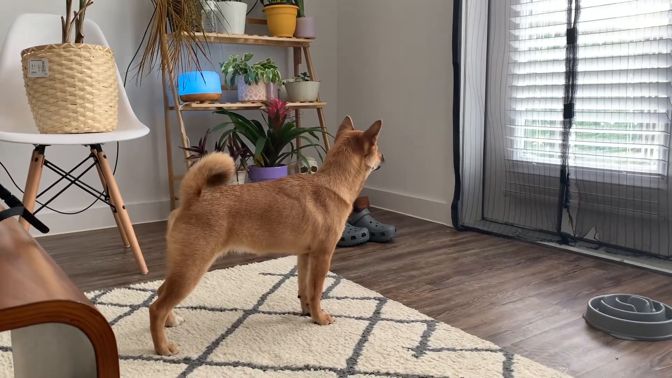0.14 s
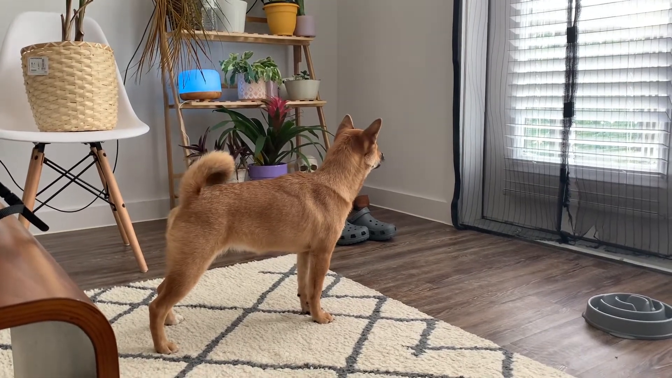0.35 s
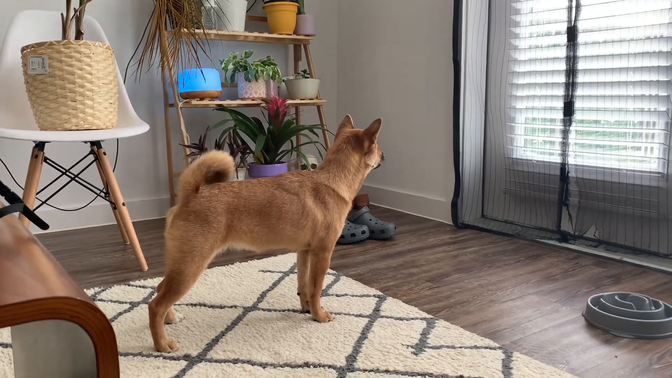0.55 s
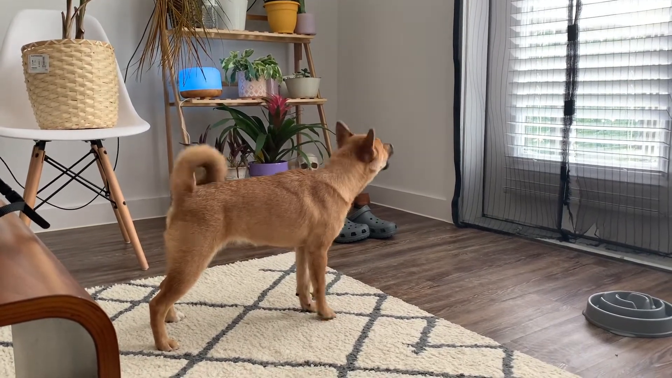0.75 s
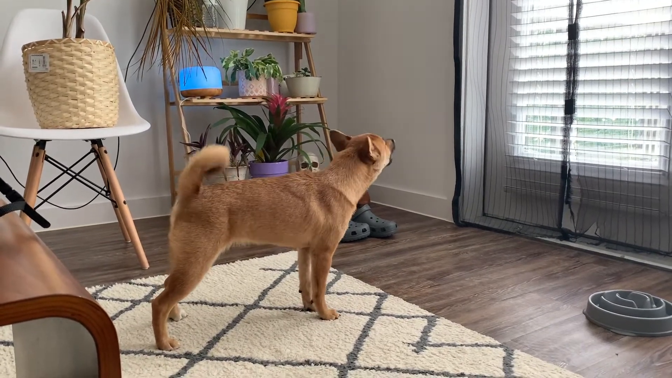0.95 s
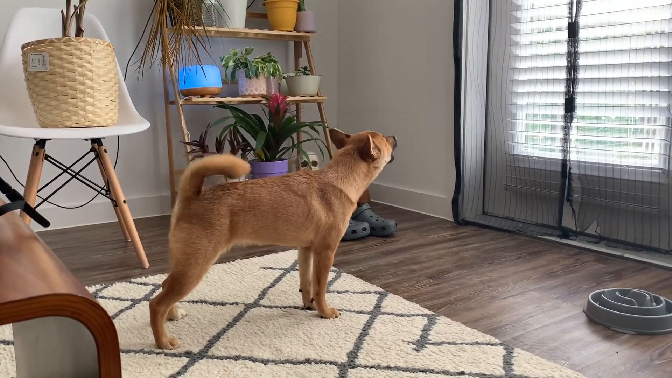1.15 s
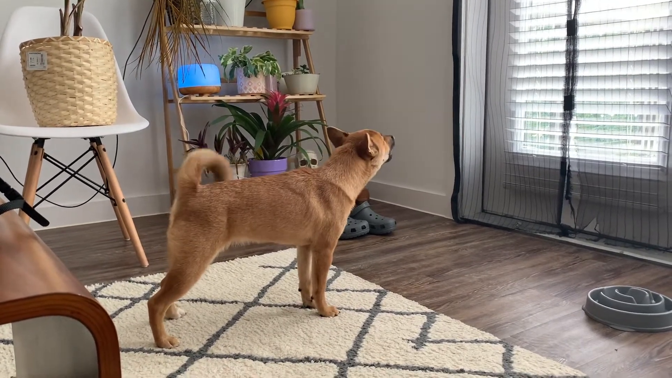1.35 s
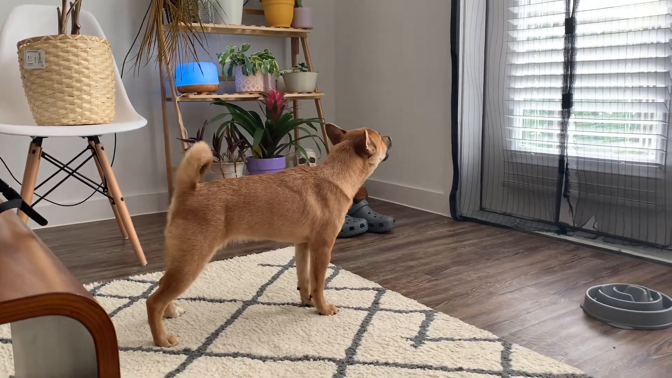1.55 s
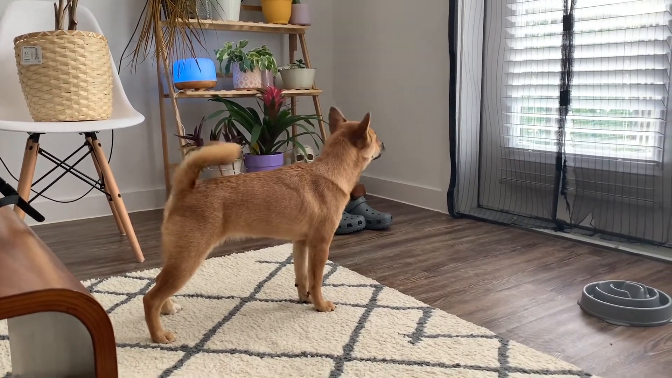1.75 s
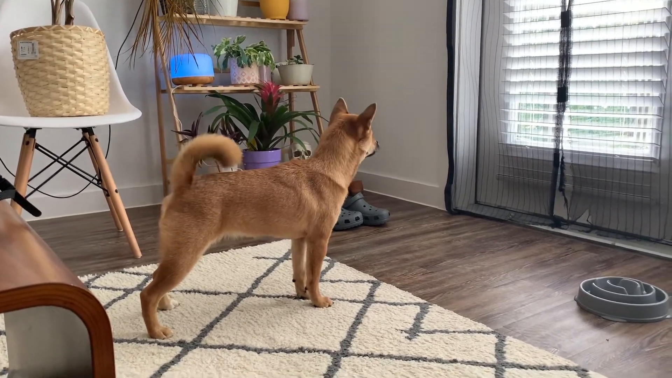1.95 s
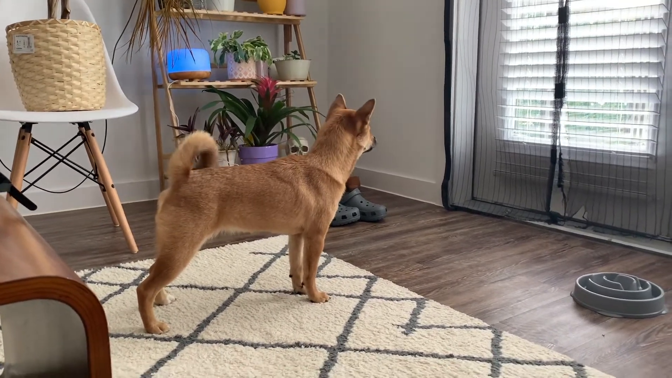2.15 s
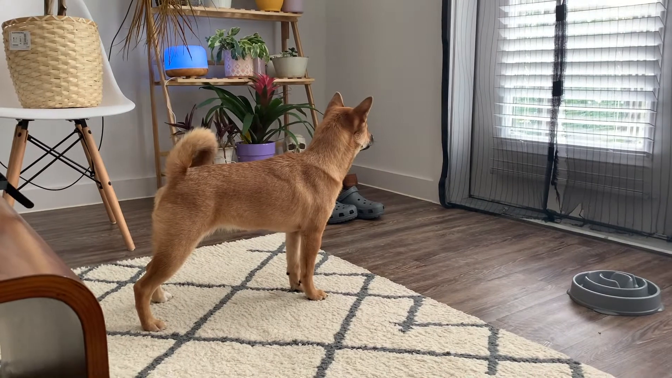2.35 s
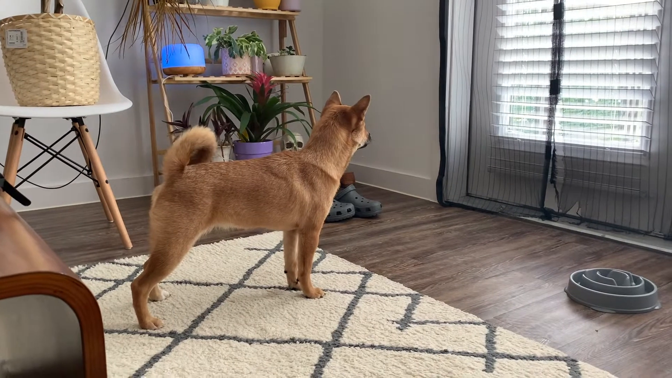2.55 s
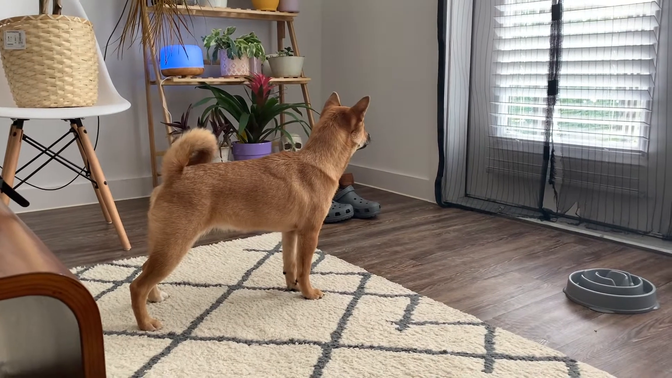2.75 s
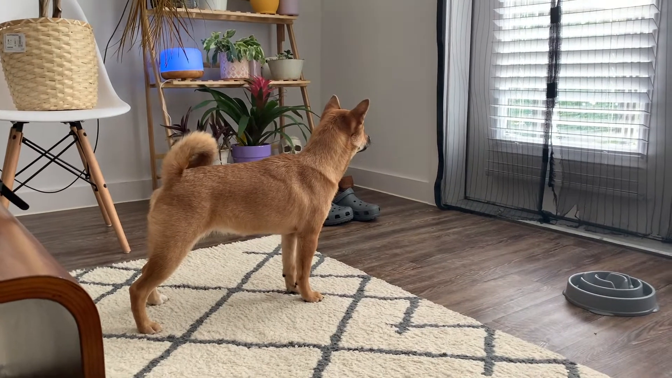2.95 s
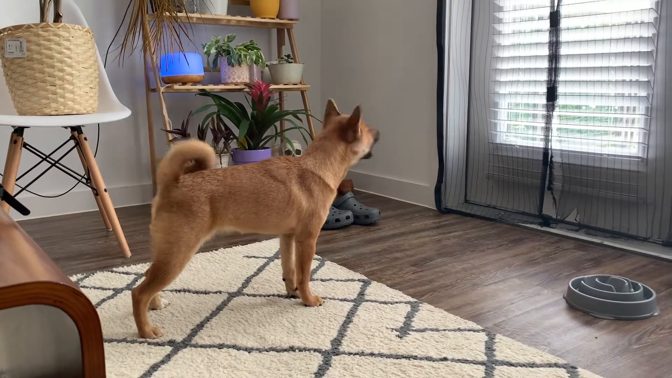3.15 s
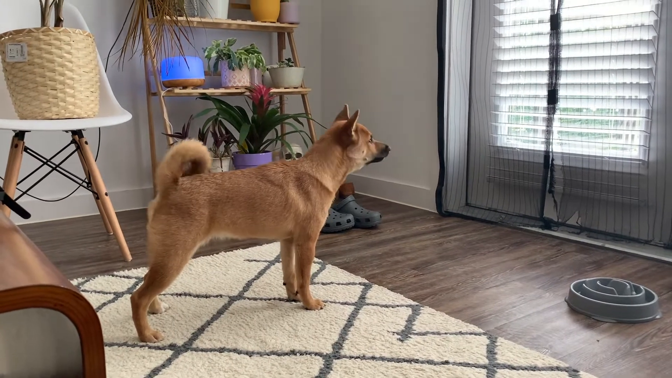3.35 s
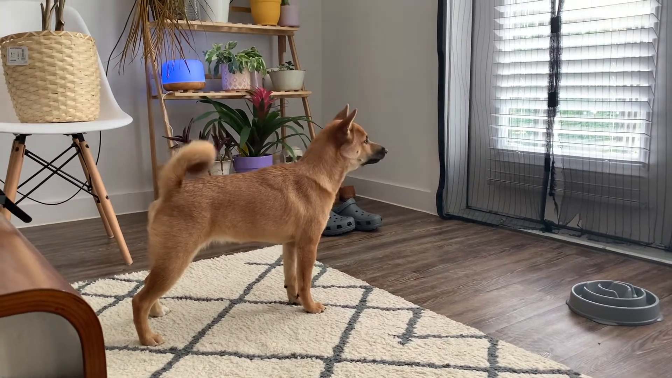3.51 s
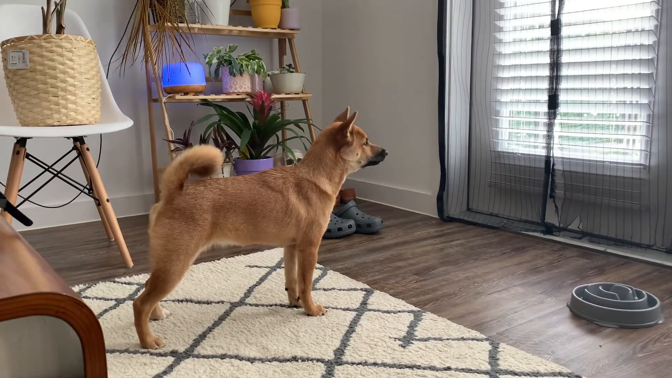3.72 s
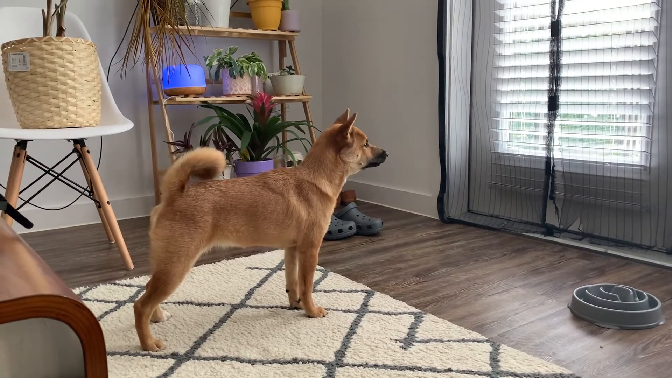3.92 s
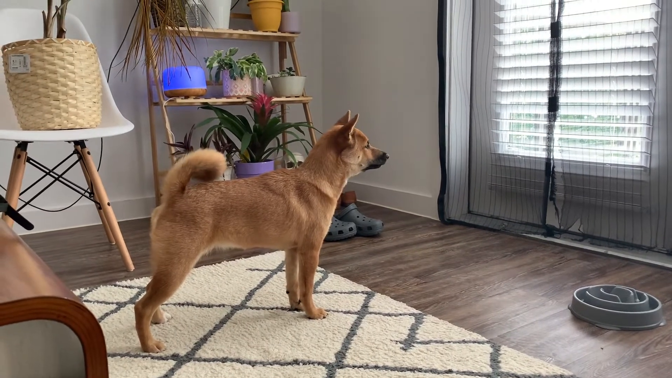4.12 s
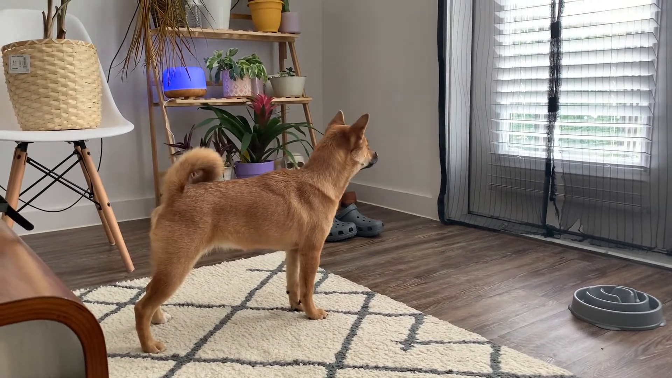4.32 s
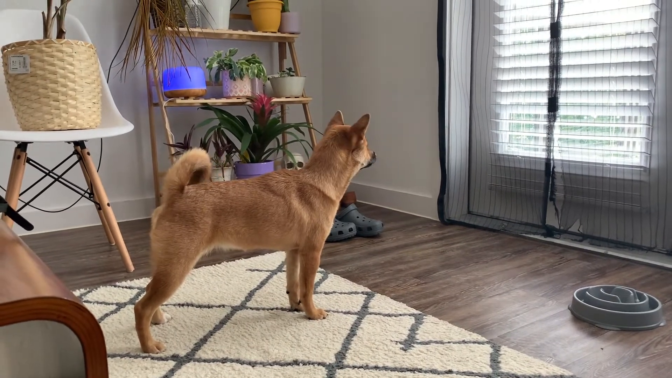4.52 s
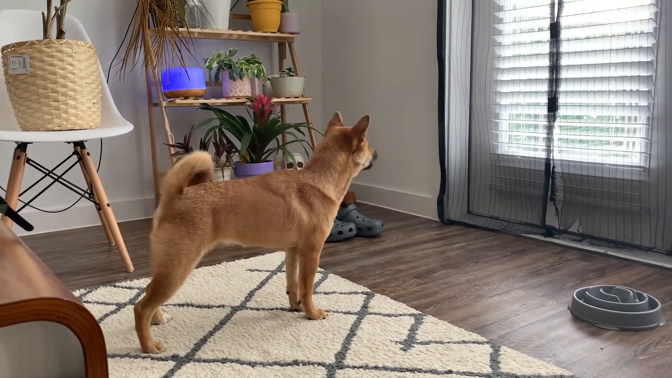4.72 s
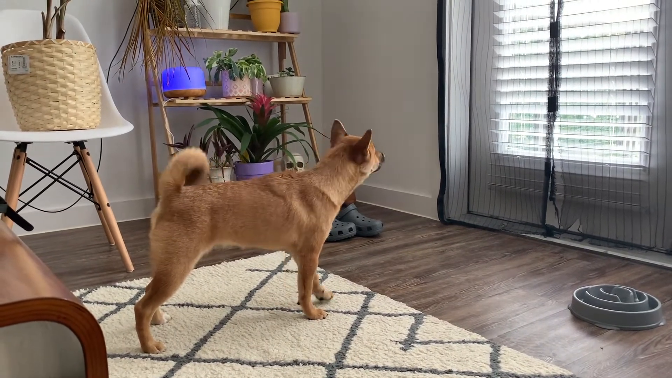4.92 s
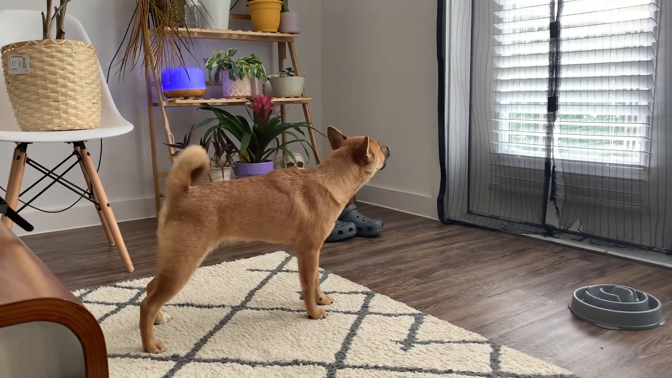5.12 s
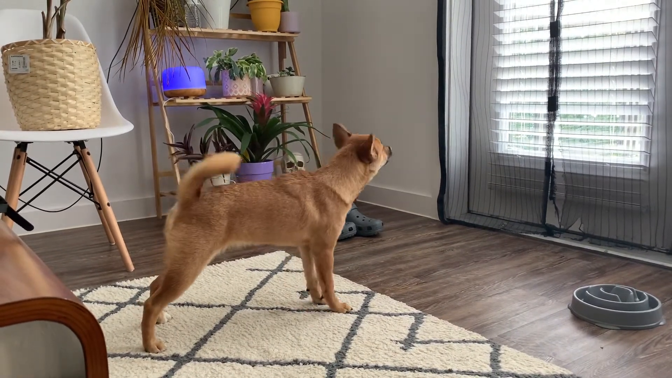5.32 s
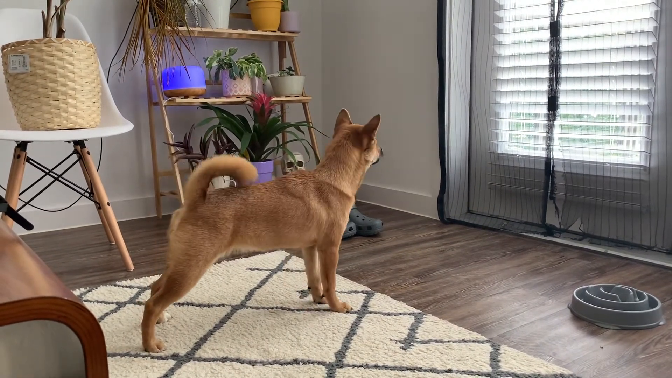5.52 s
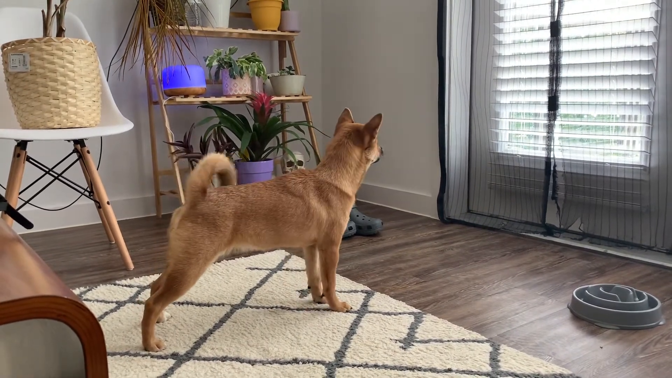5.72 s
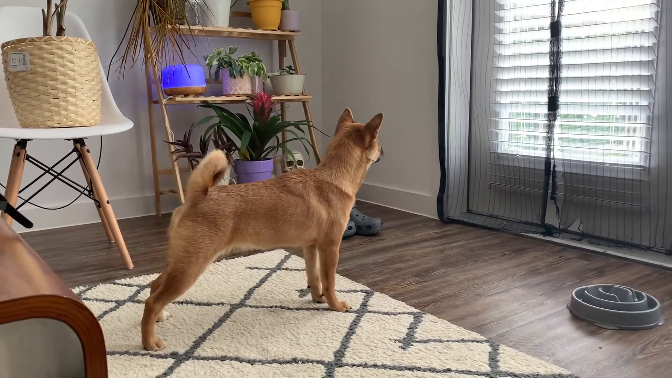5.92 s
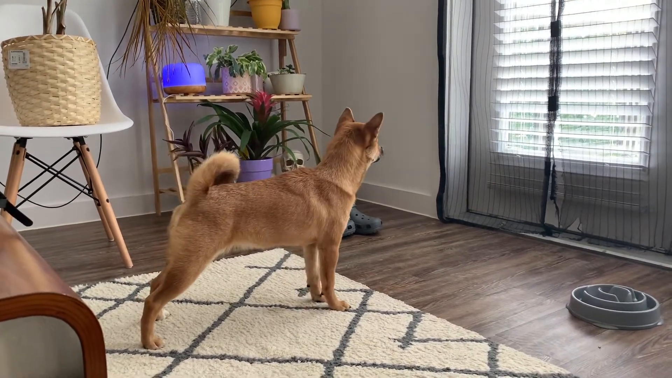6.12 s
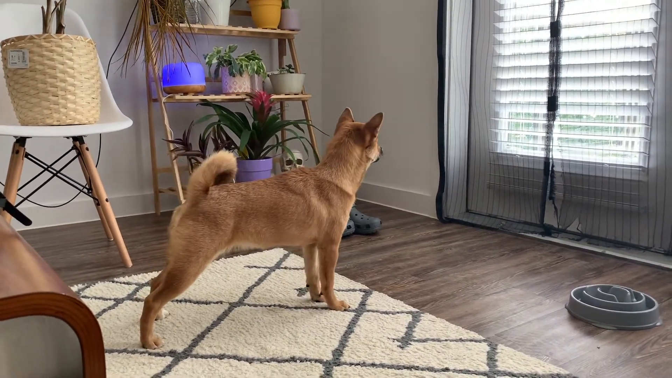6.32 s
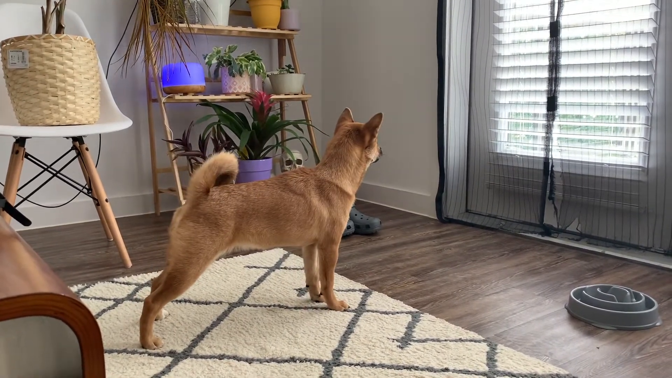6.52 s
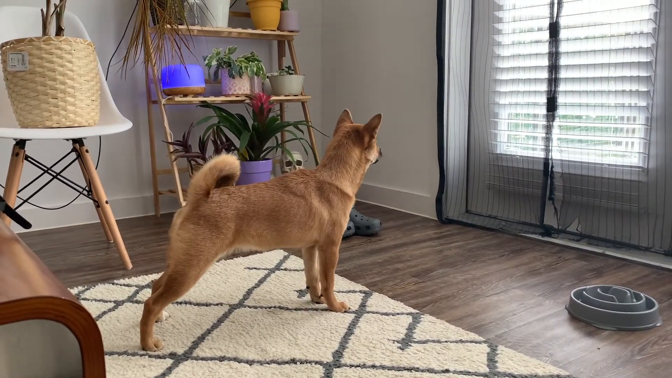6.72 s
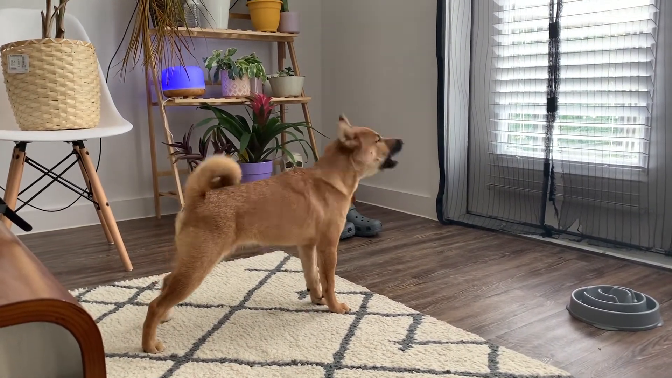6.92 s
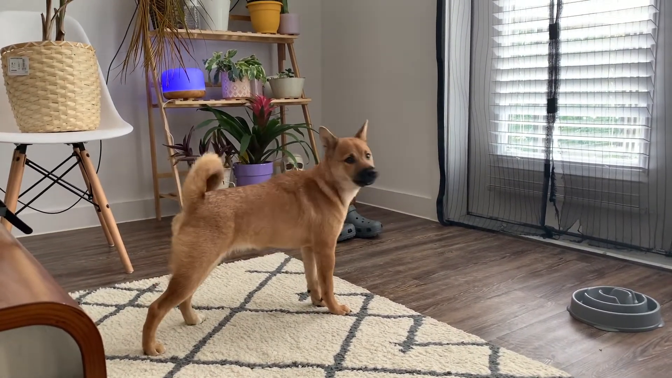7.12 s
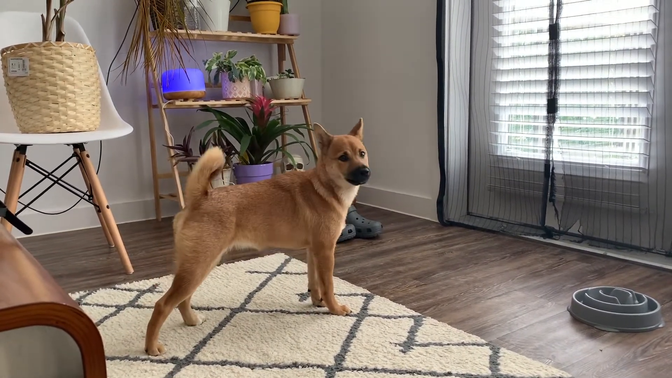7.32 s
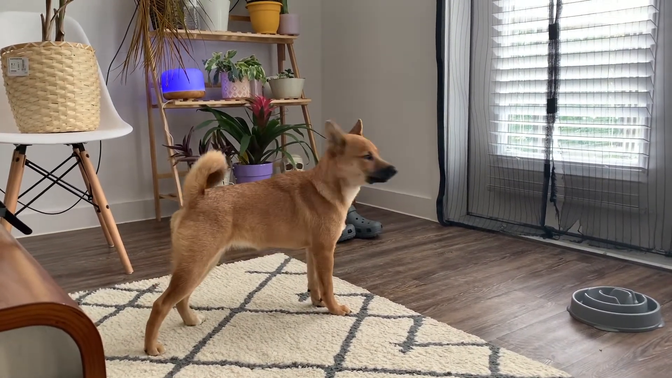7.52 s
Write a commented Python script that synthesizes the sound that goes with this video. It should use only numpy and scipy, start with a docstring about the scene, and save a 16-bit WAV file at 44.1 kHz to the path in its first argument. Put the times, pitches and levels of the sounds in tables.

```python
"""A young dog barks four times in a bright living room with a wooden floor, a few steps from a hand-held camera.
The first bark runs on into a long falling howl, the third into a rough 'woo-woo'; a soft whine follows the last.
Each call is made of vocal fold pulses and rasping air, shaped by the moving throat and the chest.
The room rings for about half a second, over handling rumble and a quiet ventilation hush with faint fan tones."""
import sys
import numpy as np
from scipy import signal
from scipy.fft import rfft, irfft, next_fast_len
from scipy.io import wavfile
from scipy.ndimage import uniform_filter1d, minimum_filter1d, map_coordinates

SR = 44100
rng = np.random.default_rng(int(sys.argv[2]) if len(sys.argv) > 2 else 0)


def transcribe(signal):
    """Save signal, clipped to [-1, 1], as a 16-bit WAV file at the path in sys.argv[1]."""
    frames = np.atleast_2d(signal).T
    limited = np.clip(frames, -1, 1)
    pcm = np.round(limited * 32767).astype(np.int16)
    wavfile.write(sys.argv[1], SR, pcm)


N = 333396  # length in samples
TOP_HZ = 15750  # upper band limit of the voice and of the camera

# most loud calls grow out of a low murmur and collapse into a short grumble; the two woos join at a high pitch
ONSET_HZ, ONSET_DB, LOUDNESS_CURVE = 206.05, -42.5, 1.36
RELEASE_S, GRUMBLE_S = .014, .105
GRUMBLE_SAG_HZ_PER_S, GRUMBLE_FADE_DB_PER_S = 550, 81
SLACK_ROUGH = 0.26  # roughness of the folds without effort

# Four barks a few steps from the microphone; level_db is the voice before the room:
# start_s, attack_s, hold_s, pitch_hz, level_db, roughness (0-1), mouth_opening (0-1), period_doubling (0-1),
# ring_hz, ring_db, room_db, treble_db
BARK_CALLS = [(0.677, .064, .044, 788.4, -7.5, .72, 0.73, .85, 1034, 7, -7, 0.5),
              (3.117, .068, 0.09, 787.4, -10, .38, 0.86, 0.21, 1279, 5.5, -6, 0),
              (4.713, .068, .088, 785, -11, 0.6, 0.91, 0.2, 1260, 2.5, -3, 0),
              (6.877, .074, .034, 743.3, -10, 0.61, 0.97, 0.44, 970, -1, -6.5, 0.5)]
# during the hold a bark sinks and fades while the jaw shuts
BARK_SAG_HZ_PER_S, BARK_FADE_DB_PER_S, JAW_CLOSE_PER_S = 650, 87.5, 2.6
TREBLE_HZ = 3500  # above this the muzzle beams its sound


def barks():
    """Short rough blasts from an open mouth; the head turns, so each has its own treble and share in the room."""
    out = 0
    for (start, attack, hold, pitch_hz, level_db, rough, mouth, doubling,
         ring_hz, ring_db, room_db, treble_db) in BARK_CALLS:
        def held_voice(s):
            sinking_hz = pitch_hz - BARK_SAG_HZ_PER_S * s
            fading_db = level_db - BARK_FADE_DB_PER_S * s
            return sinking_hz, fading_db, rough, mouth - JAW_CLOSE_PER_S * s, doubling

        voice = call(start, attack, hold, held_voice, ring_hz, ring_db, grumble_db=-43, to_hz=347.7)
        beamed = filtered(voice, lambda hz: amp(treble_db * hz ** 4 / (hz ** 4 + TREBLE_HZ ** 4)))
        out = out + room(beamed, echo_db=room_db)
    return out


# The held note of the howl, before the room: time_s, pitch_hz, level_db
HOWL_NOTE = [(.945, 696.7, -18), (0.998, 723, -15), (1.045, 667.2, -18.5), (1.151, 658.6, -20.5),
             (1.2, 646.3, -22.5), (1.399, 635.9, -22), (1.56, 629.3, -23.5), (1.626, 608.5, -23.5),
             (1.664, 575, -24.5)]
# it swells, turns from hoarse to pure, and cracks at the end
HOWL_ATTACK_S, HOWL_CLEAR_S, HOWL_BREAK_S = .062, 0.042, 0.0052


def howl(rough=.72, pure_rough=0.0027, crack_rough=0.11, doubling=1.0, hoarse_mouth=.22, pure_mouth=0.075):
    """A 'woo' held long: it clears into a pure, falling note and cracks as it gives out."""
    times, pitch_hz, level_db = np.transpose(HOWL_NOTE)
    crest, hold = times[0], times[-1] - times[0]

    def held_voice(s):
        hoarse = np.exp(-(s / HOWL_CLEAR_S) ** 2)
        crack = np.exp((s - hold) / HOWL_BREAK_S)
        hz = np.interp(crest + s, times, pitch_hz)
        db = np.interp(crest + s, times, level_db)
        roughness = pure_rough + rough * hoarse + crack_rough * crack
        return hz, db, roughness, pure_mouth + hoarse_mouth * hoarse, doubling * hoarse

    voice = call(crest - HOWL_ATTACK_S, HOWL_ATTACK_S, hold, held_voice, ring_hz=993, ring_db=9,
                 grumble_db=-36.0, to_hz=234, release_s=.006, slack_rough=0.068)
    return room(voice, echo_db=-4.5)


# Two 'woo' calls after the third bark, before the room:
# start_s, attack_s, hold_s, pitch_hz, level_db, roughness (0-1), mouth_opening (0-1), period_doubling (0-1),
# clearing_s, onset_hz, release_hz
WOO_CALLS = [(4.912, .102, .064, 754.7, -11, 0.46, .5, 1, 0.049, 204.3, 621),
             (5.121, .07, .034, 711, -11, .1, 0.21, 0.8, 0.013, 660, 300.4)]
WOO_SAG_HZ_PER_S = 444


def woos():
    """Calls through rounded lips: each starts hoarse and clears into a tone as the mouth closes."""
    out = 0
    for (start, attack, hold, pitch_hz, level_db, rough, mouth, doubling,
         clear_s, from_hz, to_hz) in WOO_CALLS:
        def held_voice(s):
            hoarse = np.exp(-(s / clear_s) ** 2)
            sinking_hz = pitch_hz - WOO_SAG_HZ_PER_S * s
            return sinking_hz, level_db, rough * hoarse, mouth * hoarse, doubling * hoarse

        out = out + call(start, attack, hold, held_voice, ring_hz=996, ring_db=5.5,
                         grumble_db=-42.5, to_hz=to_hz, from_hz=from_hz)
    return room(out, echo_db=-6.0)


# Soft whines after the last bark; level_db is set before the lips and the room:
# start_s, length_s, pitch_hz, level_db, roughness (0-1), mouth_opening (0-1)
WHINE_CALLS = [(7.422, 0.038, 404.6, -43.5, 0.12, .23), (7.456, 0.034, 376, -42.5, 0.66, 0),
               (7.51, 0.049, 430, -55, 0.06, 0)]


def whines(swell_db=14):
    """Faint arches of voice behind closed lips, which muffle the upper range."""
    closed_lips = [(500, 2), (900, -7), (1600, -16), (4000, -20)]  # hz, gain_db
    out = 0
    for start, length, pitch_hz, level_db, rough, mouth in WHINE_CALLS:
        t = span(start, start + length)
        arch_db = level_db - swell_db * np.linspace(-1, 1, len(t)) ** 2
        out = out + sound(t, np.full(len(t), pitch_hz), arch_db, rough, mouth, rough / 2,
                          ring_hz=1000, ring_db=10.5, soft_db=-41)
    return room(resonate(out, lambda hz: along(closed_lips, hz)), echo_db=-2)


def call(start, attack, hold, held_voice, ring_hz, ring_db, grumble_db, to_hz,
         from_hz=ONSET_HZ, release_s=RELEASE_S, slack_rough=SLACK_ROUGH):
    """Effort rises, holds and collapses; it draws the slack folds to held_voice(seconds since the crest)."""
    crest = start + attack
    t = span(start, crest + hold + GRUMBLE_S)
    after = np.maximum(t - crest - hold, 0)
    rise = np.sin(np.pi / 2 * np.clip((t - start) / attack, 0, 1)) ** 2
    effort = rise * np.exp(-after / release_s)
    slack = 1 - effort
    held_hz, held_db, held_rough, mouth, doubling = held_voice(np.clip(t - crest, 0, hold))
    slack_hz = np.where(t < crest, from_hz, to_hz - GRUMBLE_SAG_HZ_PER_S * after)
    slack_db = np.where(t < crest, ONSET_DB, grumble_db - GRUMBLE_FADE_DB_PER_S * after)
    pitch = held_hz + slack * (slack_hz - held_hz)
    level_db = held_db + slack ** LOUDNESS_CURVE * (slack_db - held_db)
    rough = held_rough + slack * (slack_rough - held_rough)
    return sound(t, pitch, level_db, rough, mouth, effort * doubling, ring_hz, ring_db)


# The voice heard through the walls of neck and chest: hz, gain_db
CHEST_WALL = [(30, -53.5), (170, 0.5), (430, 3.5), (750, -20.5), (1500, -47.5), (4000, -74.5)]


def sound(t, pitch, level_db, rough, mouth, doubling, ring_hz, ring_db, ring_width=190, soft_db=-36, chest_hz=450):
    """The folds sound through the mouth, and through the chest while the voice is soft and low."""
    rough, mouth, doubling = np.clip(np.broadcast_arrays(rough, mouth, doubling), 0, 1)
    source = folds(pitch, rough, doubling)
    voice = throat(source, mouth)
    # a strained throat sharpens the second resonance; the tongue sets where it lies
    strained = resonate(voice, lambda hz: ring_db / (1 + (2 * (hz - ring_hz) / ring_width) ** 2))
    strain = np.clip(2 * rough, 0, 1)
    chest = resonate(source, lambda hz: along(CHEST_WALL, hz))
    chest_share = amp(0.2 * (soft_db - level_db)) / (1 + (pitch / chest_hz) ** 6)
    voice = (1 - strain) * voice + strain * strained + chest_share * chest
    # even out the short-term level, so that level_db alone sets the loudness
    voice /= np.sqrt(np.abs(uniform_filter1d(voice ** 2, SR // 60)) + 1e-12)
    edges = np.clip(np.minimum(t - t[0], t[-1] - t) / .011, 0, 1)  # 11 ms fades
    return np.pad(voice * amp(level_db) * edges, (round(t[0] * SR), N))[:N]


TREMOR = .0011  # depth of the pitch waver of a steady note, as a share of the pitch


def folds(pitch, rough, doubling, jitter=.07, shimmer_db=3, air=.75, flicker_db=4,
          airy_hz=9000, airy_db=-3.5, count=36):
    """Vocal fold pulses: under strain their timing and size scatter and air rasps through at each opening."""
    n = len(pitch)
    pitch = pitch * (1 + jitter * rough * wobble(330, n) + TREMOR * wobble(45, n))
    phase = 2 * np.pi * np.cumsum(pitch) / SR
    pulses = 0
    for k in range(1, count + 1):
        # the folds never close twice alike, so the upper overtones come and go
        flicker = amp(flicker_db * (1 - 1 / k) * wobble(13, n))
        pulses = pulses + flicker * (k * pitch < TOP_HZ) * np.cos(k * phase)
    pulses = pulses / 5.53  # brings the sum near the level of the rasp
    pulses *= 1 + doubling * np.cos(phase / 2)  # strong and weak pulses alternate: lines halfway between harmonics
    rasp = unit(rng.standard_normal(n) * (1 + .8 * np.cos(phase)))

    def clear(hz):
        return 1 / (1 + (hz / airy_hz) ** 4)

    # even in a clear note, turbulence blurs the highest overtones
    blur = amp(airy_db) * filtered(rasp, lambda hz: 1 - clear(hz))
    pulses = filtered(pulses, lambda hz: np.sqrt(clear(hz))) + blur
    share = np.clip(air * rough, 0, 1)
    shimmer = amp(shimmer_db * rough * wobble(260, n))
    return (np.sqrt(1 - share) * pulses + np.sqrt(share) * rasp) * shimmer


# Peaks and valleys of the throat, which slide as the mouth opens: rounded_hz, rounded_db, open_hz, open_db
THROAT_SHAPE = [(29.83, -69.5, 67, -67), (231.2, -26.5, 220, -24), (488, -18.5, 540, -18.5),
                (620, 4.5, 630, -3.5), (820, 3.5, 450, 0), (860, -7, 1130, -7.5), (1086, -1.5, 1290, -2.5),
                (1290, -27.5, 1500, -11.5), (1390, -34, 2050, -12.5), (2017, -14, 2300, -10.5),
                (2600, -35, 2850, -28.5), (3238, -45.5, 3630, -40)]
# Weak upper resonances of the muzzle, at fixed places: hz, rounded_db, open_db
MUZZLE_SHAPE = [(3500, -1.5, -1), (4096, 5, 8.5), (4620, 0.5, -3), (5230, 3.5, 3.5), (5500, -12, 6.5),
                (6460, -15, 0), (8316, -13.5, -27), (9400, 0.5, -7.5), (11400, 11, -4.5),
                (13000, -7.5, -8.5), (15500, -11, -10)]


def throat(source, mouth, count=5):
    """Moving resonances: a cross-fade between a few mouth shapes from rounded to wide open."""
    lower, upper = np.array(THROAT_SHAPE), np.array(MUZZLE_SHAPE)
    out = 0
    for opening in np.linspace(0, 1, count):
        formants = (1 - opening) * lower[:, :2] + opening * lower[:, 2:]
        sizzle = (1 - opening) * upper[:, :2] + opening * upper[:, ::2]
        weight = np.clip(1 - np.abs(mouth - opening) * (count - 1), 0, 1)
        out = out + weight * resonate(source, lambda hz: along(formants, hz) + along(sizzle, hz))
    return out


# Time for the room to die away by 60 dB: hz, decay_s
ROOM_DECAY = [(150, 0.39), (700, 0.71), (2200, 0.68), (5000, 0.46), (11000, 0.45), (16000, 0.42)]
# Likeness of the tail at the left and right microphone ports: hz, likeness (-1 to 1)
ROOM_LIKENESS = [(100, 1), (350, .8), (700, .05), (1200, -0.0068), (2200, 0.14), (4000, 1), (10000, -.05)]
# Standing waves between the walls: hz, level_db (against the dense tail)
STANDING_WAVES = [(467, 9), (673, 3), (703, -2.5), (756, 0.5), (836, -1), (975, 5), (1040, 13), (1154, -1),
                  (1268, 2.5), (1472, -1), (2219, 0), (2259, -2)]


def room(x, direct_db=-3.5, echo_db=-4.5, lag=0.0001, build_up=0.001):
    """The direct sound reaches the right port first; walls, glass door and floor answer with a dense tail."""
    hz, t, noise = signal.stft(rng.standard_normal((2, SR)), SR, nperseg=256)
    decay = amp(-60 * t / along(ROOM_DECAY, hz)[:, None])
    tail = signal.istft(noise * decay, SR, nperseg=256)[1]
    t = np.arange(tail.shape[1]) / SR
    tail = spread(tail * (1 - np.exp(-t / build_up)), ROOM_LIKENESS)
    tail /= np.linalg.norm(tail[0])
    for mode_hz, mode_db in STANDING_WAVES:
        rate = np.log(1000) / along(ROOM_DECAY, mode_hz)  # 60 dB is a factor of 1000
        phase = 0.36 * rng.standard_normal((2, 1))
        ringing = np.exp(-rate * t) * np.cos(2 * np.pi * mode_hz * t + phase)
        tail += 2 * rate / SR * amp(mode_db) * ringing
    echo = signal.fftconvolve(x[None], tail, axes=1)[:, :N]
    # half the lag late on the left, half early on the right
    ports = np.array([[-1], [1]])
    direct = filtered(np.array([x, x]), lambda hz: np.exp(1j * np.pi * hz * lag * ports))
    return amp(direct_db) * direct + amp(echo_db) * echo


# Soft bumps of the hand on the camera: centre_s, level_db, half_length_s
HAND_BUMPS = [(2.219, -54, 0.0834), (3.592, -50.5, 0.038), (3.709, -52.5, 0.044), (3.938, -56.5, 0.045),
              (4.037, -51.5, 0.029), (4.431, -59.5, 0.062)]
# Spectral shape of a bump: hz, relative_db
BUMP_SPECTRUM = [(20, -49), (45, 2), (70, 2.5), (110, -10), (200, -37.5), (600, -70), (2000, -120)]


def handling():
    """Low swells of rumble through the camera body, alike in both ports."""
    t = np.arange(N) / SR
    swells = sum(amp(db) * np.exp(-((t - s) / half) ** 2 / 2) for s, db, half in HAND_BUMPS)
    rumble = filtered(rng.standard_normal(N), lambda hz: amp(along(BUMP_SPECTRUM, hz)))
    return swells * unit(rumble)


# Spectral shape of the hush: hz, relative_db
HUSH_SPECTRUM = [(15, -58.5), (28, -25), (50, -5.5), (101, -3), (165, -3.5), (204, -4.5), (250, -2.5),
                 (410, -5), (582, -15), (848, -11.5), (1200, -14), (3630, -27), (8000, -45), (15500, -58.5)]
# Likeness of the hush at the left and right ports: hz, likeness (-1 to 1)
HUSH_LIKENESS = [(60, 0.96), (240, 0.25), (950, -0.23), (3770, -0.25), (15000, -0.17)]
# Slow course of the hush: time_s, level_db
HUSH_COURSE = [(0, -54), (.6, -56), (2.5, -59.5), (4.4, -58), (6.3, -57.5), (7.5, -57.5)]
# Faint fan tones: hz, level_db (before the waver)
FAN_TONES = [(207, -69), (838, -78)]


def ventilation(waver_db=3):
    """A dull hush of shaped noise with two fan tones that waver in level and phase."""
    t = np.arange(N) / SR
    noise = spread(rng.standard_normal((2, N)), HUSH_LIKENESS)
    air = filtered(noise, lambda hz: amp(along(HUSH_SPECTRUM, hz)))
    out = unit(air) * amp(np.interp(t, *np.transpose(HUSH_COURSE)))
    for hz, db in FAN_TONES:
        tone = unit(np.sin(2 * np.pi * hz * t + wobble(19, N)))
        out = out + amp(db + waver_db * wobble(27.0, N)) * tone
    return out


def amp(db):
    """Decibels to gain."""
    return 10 ** (np.asarray(db) / 20)


def unit(x):
    """x at rms 1."""
    return x / np.sqrt(np.mean(x ** 2) + 1e-20)


def along(points, hz):
    """(hz, value) points read on a log axis."""
    f, v = np.transpose(points)
    return np.interp(np.log(hz + 1), np.log(f + 1), v)


def span(start, stop):
    """The sample times from start to stop, in seconds."""
    return np.arange(round(start * SR), round(stop * SR)) / SR


def wobble(rate, size):
    """A smooth random curve, rate knots a second."""
    knots = rng.standard_normal(int(size * rate / SR) + 4)
    return map_coordinates(knots, [np.arange(size) * rate / SR])


def filtered(x, response):
    """x times a response of frequency."""
    n = x.shape[-1]
    m = next_fast_len(n + SR // 10)
    return irfft(rfft(x, m) * response(np.fft.rfftfreq(m, 1 / SR)), m)[..., :n]


def resonate(x, shape_db, size=2048):
    """x through a causal (minimum-phase) filter with the given dB shape."""
    cepstrum = irfft(np.log(amp(shape_db(np.fft.rfftfreq(size, 1 / SR)))))
    # fold the backward half of the cepstrum onto the forward half
    cepstrum[1:size // 2] *= 2
    cepstrum[size // 2 + 1:] = 0
    return signal.fftconvolve(x, irfft(np.exp(rfft(cepstrum))))[:len(x)]


def spread(pair, alike):
    """Two unrelated signals mixed to a left and right of the given likeness."""
    def mid_side_gains(hz):
        turn = np.arccos(np.clip(along(alike, hz), -1, 1)) / 2
        return np.array([np.cos(turn), np.sin(turn)])

    mid, side = filtered(pair, mid_side_gains)
    return np.array([mid + side, mid - side])


def scene():
    """Dog in the room, handling and ventilation."""
    return barks() + howl() + woos() + whines() + handling() + ventilation()


def record(dry, ceiling=1.0):
    """The camera's limiter ducks any peak above the ceiling; nothing is kept above its band limit."""
    needed = np.minimum(1, ceiling / (np.abs(dry).max(axis=0) + 1e-9))
    gain = uniform_filter1d(minimum_filter1d(needed, SR // 100), SR // 100)  # 10 ms hold and smoothing
    return filtered(dry * gain, lambda hz: np.clip((TOP_HZ - hz) / 300 + .5, 0, 1))


dry = scene()
out = record(dry)
transcribe(out)
```